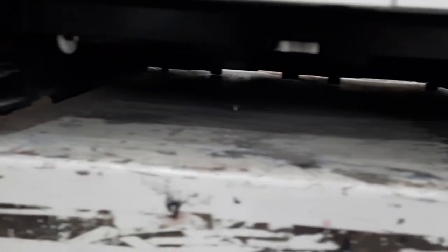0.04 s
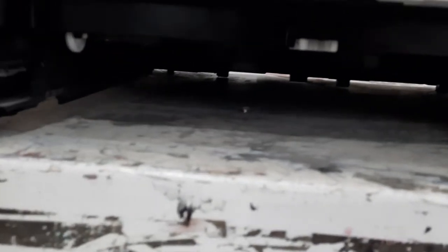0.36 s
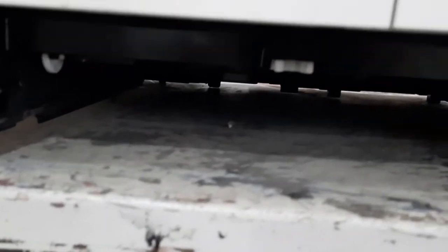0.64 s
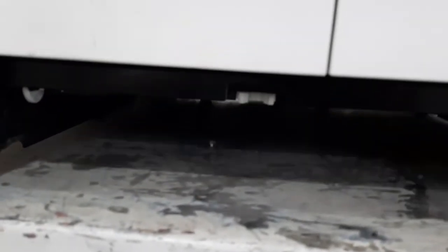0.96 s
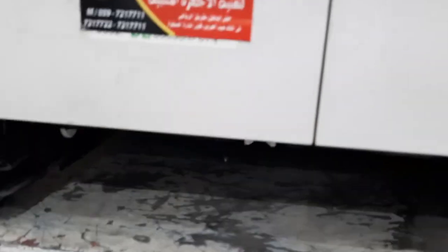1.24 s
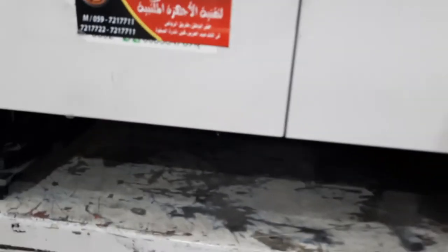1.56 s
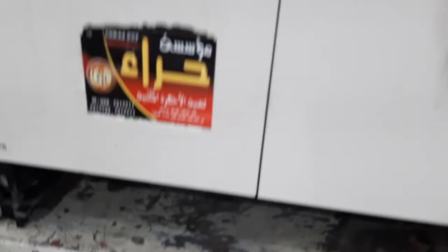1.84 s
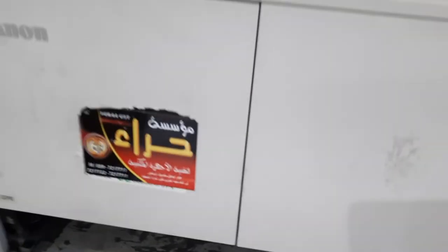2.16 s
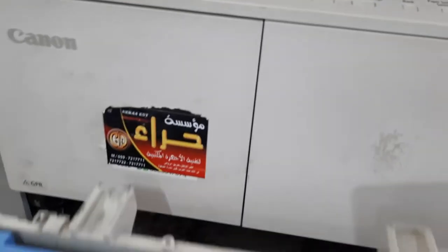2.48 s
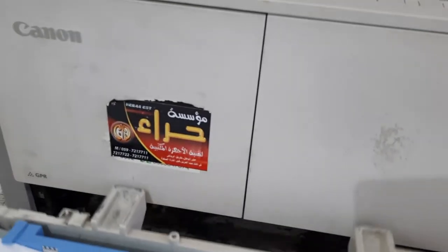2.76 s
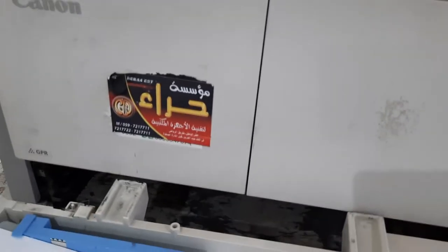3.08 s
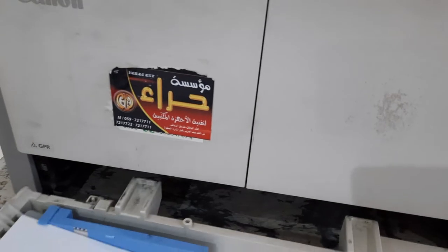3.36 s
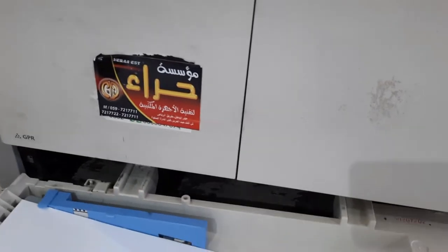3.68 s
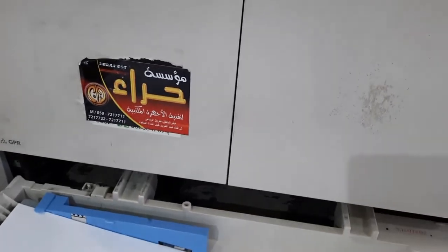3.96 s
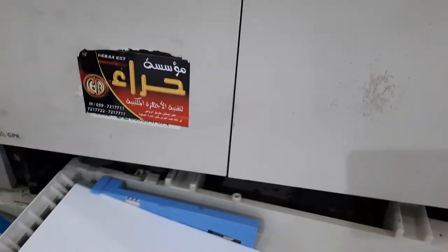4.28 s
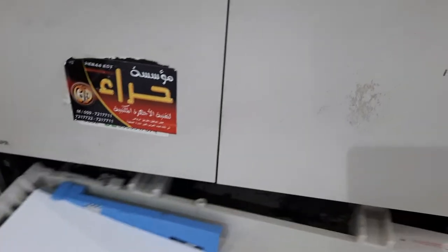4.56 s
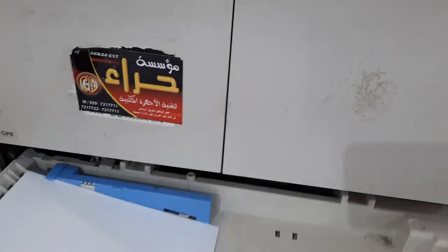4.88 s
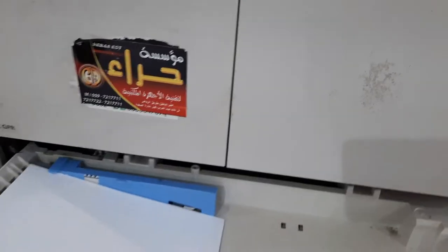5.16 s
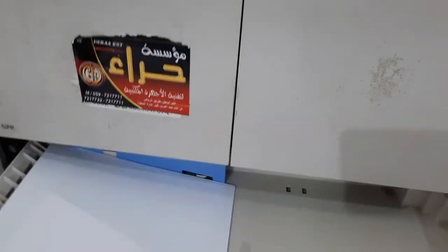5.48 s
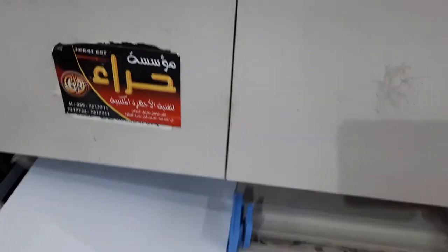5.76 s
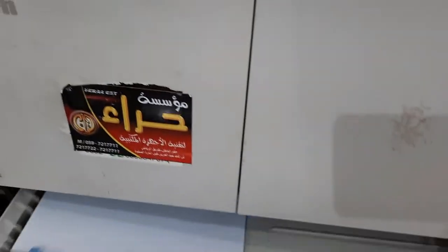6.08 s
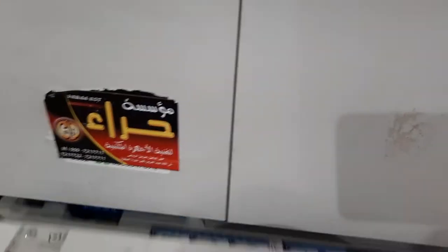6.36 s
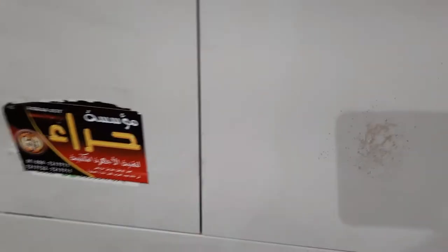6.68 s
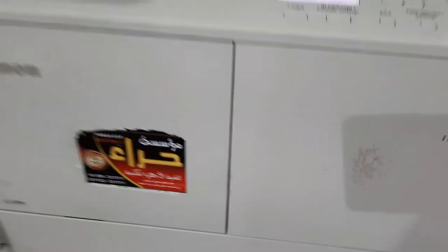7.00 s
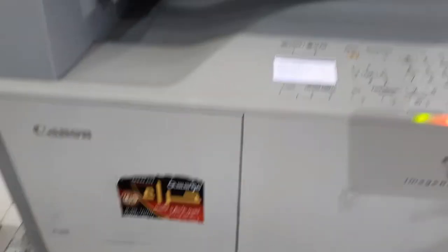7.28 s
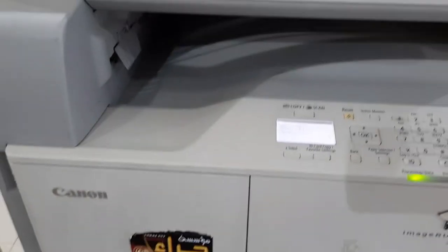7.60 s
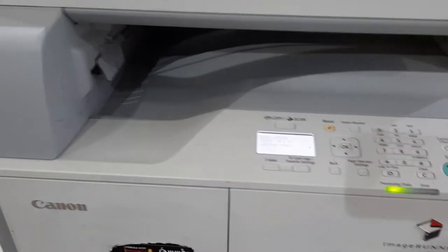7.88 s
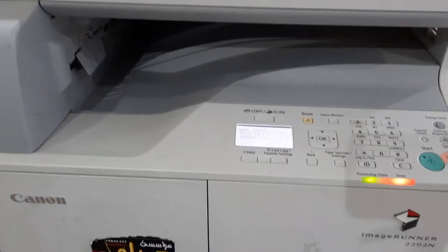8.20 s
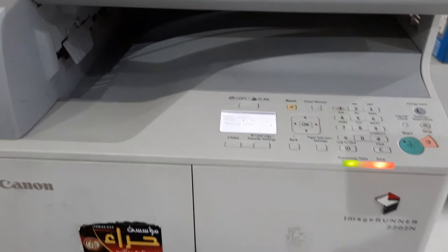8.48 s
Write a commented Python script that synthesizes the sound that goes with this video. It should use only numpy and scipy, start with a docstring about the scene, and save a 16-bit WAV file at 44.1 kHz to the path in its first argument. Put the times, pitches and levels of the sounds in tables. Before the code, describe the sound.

In a hard-walled room with a low hum and faint distant traffic, a loaded plastic paper tray is picked up with a few light knocks. It bumps and clatters against an office copier, tabs snapping as it is jiggled onto its rails, then scrapes inward and shuts with a hollow, ringing thud. A catch clicks close by. Soft handling rumble sits on the nearby stereo microphones.

```python
"""Loading an office copier's paper tray

In a hard-walled room a loaded plastic tray is lifted, knocked onto its rails, slid in and shut with a
thud. Loose parts clatter and tabs snap in the tray, and the cabinet rings along once the tray is in it.
Afterwards a catch clicks close by. Underneath lie a low hum, distant traffic and an uneven low rumble
of handling at the microphones."""
import sys
import numpy as np
from scipy import signal
from scipy.fft import rfft, irfft, next_fast_len
from scipy.io import wavfile
from scipy.ndimage import uniform_filter1d, map_coordinates

SR = 44100
rng = np.random.default_rng(int(sys.argv[2]) if len(sys.argv) > 2 else 0)


def write(x):
    x = np.atleast_2d(x).T
    wavfile.write(sys.argv[1], SR, np.round(np.clip(x, -1, 1) * 32767).astype(np.int16))


N = 381024

# Spectra of the far traffic and the faint hiss: frequency_hz, density_db
DRONE_SPECTRUM = [(120, -24), (200, -13), (260, 0), (340, -1), (440, -3), (520, -14), (800, -30),
                  (2000, -90)]
WASH_SPECTRUM = [(100, 1), (600, -1), (1000, 1.5), (1800, -4.5), (3000, -18), (6000, -27), (16000, -42)]
HISS_SPECTRUM = [(2000, -4), (5500, 0), (8000, -3), (10000, -9), (16000, -11)]
# Spectrum of the handling rumble and the cabinet's shudder: frequency_hz, density_db
RUMBLE_SPECTRUM = [(20, -32), (40, -14), (63, 0), (90, -7), (125, -7), (180, -16), (300, -22), (500, -45),
                   (1200, -90)]
# Course of the handling rumble at the microphones: time_s, level_db
HANDLING_LEVELS = [(0, -42), (.8, -51), (.97, -52.5), (1.12, -43.5), (1.42, -58), (1.549, -62), (1.95, -55),
                   (2.14, -63), (2.4, -55.5), (3.1, -52), (3.3, -64), (7.1, -57.5), (7.349, -64),
                   (8.6, -56.5)]
# Traffic passing in the distance: loudest_s, half_length_s, drone_db, wash_db
TRAFFIC_PASSES = [(0.07, 0.33, -44, -68.5), (8.597, 0.9, -62, -64)]
# Narrow tones in the drone: pitch_hz, width_hz, gain_db
DRONE_TONES = [(272, 150, 0), (427, 15, -0.5)]
# Spells of hum, cabinet shudder, paper swish and tray groan: start_s, length_s, level_db
HUM_SPELLS = [(0, 3.1, -49), (7.893, 0.64, -62)]
SHUDDER_SPELL = (3.5, 3.4, -46.5)
PAPER_SPELL = (4.505, .09, -35.5)
GROAN_SPELL = (3.585, 0.16, -32)

# Ring times of the room, the cabinet's hollow and its panels: frequency_hz, t60_s
ROOM_DECAY = [(100, 1.25), (400, 1.3), (1000, 1.08), (2500, .96), (5000, .76), (9000, .68), (15000, .62)]
HOLLOW_DECAY = [(100, 0.72), (1000, 0.49), (12000, 0.41)]
PANEL_DECAY = [(80, 1.9), (330, 1.56), (520, 0.16), (1200, 0.12)]
# Stereo width at the microphones: frequency_hz, side_gain_db
STEREO_WIDTH = [(60, -22), (170, -19), (330, -12), (650, -8), (1100, -.5), (4000, 0), (14000, 0)]
# Balance between the microphones: frequency_hz, left_minus_right_db
STEREO_BALANCE = [(80, 0), (330, 1.2), (700, 2.4), (1400, 1.9), (2800, .6), (5600, -2.6), (10000, 1.6),
                  (14000, 3.9)]

# Spectra of the sounds at the copier: frequency_hz, density_db
CLICK_SPECTRUM = [(300, -40), (1200, 4), (2000, 6), (5500, 4), (8500, 1.5), (11000, -5.5), (16000, -2)]
PAPER_SPECTRUM = [(800, -10.5), (2300, -6.5), (3300, 1.5), (7000, -4.5), (9000, -15.5), (15000, -23.5)]
RAIL_SPECTRUM = [(25, -52), (50, -7), (80, -0.5), (200, -2), (350, -8), (620, -6), (1500, -10), (3000, -16),
                 (6000, -23), (9800, -33.5), (12500, -29), (16000, -45)]
CRACK_SPECTRUM = [(300, -17), (900, -8), (2600, 0.5), (5500, -1), (7500, -8), (10000, -10), (14000, -13),
                  (16000, -18)]
BOOM_SPECTRUM = [(50, -10), (85, -6.5), (140, 0), (230, -11.5), (325, 0.5), (410, -14.5), (520, 4.5),
                 (800, -3.5), (1100, -5), (2000, -43.5)]
PLASTIC_SPECTRUM = [(25, -48), (50, -20), (80, -11), (160, -5), (300, -4), (600, -2), (1200, -8),
                    (2300, -14), (5500, -20), (9500, -31), (13000, -33), (16000, -42)]
# Modes of the front panel and of a stiff tab: pitch_hz, gain_db, t60_s
FRONT_PANEL_MODES = [(141, -9, 0.51), (295, -13, 0.15), (326.7, 16, 0.11), (630, -25, .08)]
TAB_MODES = [(2210, -3.5, .014), (2660, -9.5, 0.017), (3900, -5.5, 0.012), (4530, -7.5, 0.014),
             (4770, -4, 0.0098), (6126, -3.5, .012), (8850, -12, 0.0086)]
# Resonances of the tray, and of the cabinet with its rails: pitch_hz, width_hz, gain_db
TRAY_MODES = [(80, 9.5, 10.5), (150, 42, -0.5), (209, 6.9, 4), (320.6, 18, -1), (620, 33, -9),
              (668, 34, -7), (761, 49, -15.5), (968, 41, -6.5), (1134, 30, -1), (1205, 44, -9),
              (1426, 9.2, 7), (1965, 14, 6), (2283, 150, 2)]
CABINET_MODES = [(81.5, 12, 1), (140, 8.4, -9), (216, 13, -1), (314, 26, 5.5), (512, 9.1, 3), (490, 17, -9),
                 (620, 34, -2.5), (700, 35, -10), (830, 22, -4.5), (950, 20, -2.5), (1067, 12, -0.5),
                 (1426, 15, -3), (1630, 33, -5)]

# Clicks near the microphones: start_s, level_db, ring_offset_db, cutoff_hz
NEAR_CLICKS = [(1.514, -43.5, -35, 10600), (6.875, -40, 10, 5200)]
# Friction on the rails: time_s, relative_level_db
RAIL_FRICTION = [(5.27, -70), (5.35, -35), (5.516, -43), (5.61, -33), (5.754, -31.5), (5.886, -30),
                 (6.104, -38), (6.255, -35), (6.3, -32.5), (6.42, -34.5), (6.464, -36.5), (6.55, -29.5)]
# Shift of the resonances as the tray goes in: time_s, pitch_ratio
TRAVEL_PITCH = [(5.4, 1.12), (5.8, 1.02), (6.1, .95), (6.5, 1.0)]
# Plastic tabs and guides snapping: start_s, level_db, pitch_ratio
TAB_SNAPS = [(2.872, -25, 0.88), (4.386, -33.5, 0.59), (4.393, -31, 1.2), (4.824, -28.5, 0.86),
             (4.883, -37.5, 0.82), (4.972, -37.5, 0.93), (5.485, -40, 0.7), (5.729, -37.5, 1.6),
             (5.924, -34.5, 1), (5.969, -36.5, 0.85), (6.027, -41, 0.74), (6.081, -40.5, 1.2),
             (6.282, -32, 0.89), (6.308, -33.5, 0.64), (6.357, -36, 0.88)]
# The tray hitting its stop: start_s, level_db
TRAY_STOP = (6.503, -22)
# Thud, knock, clack and snap bands of a blow: low_hz, high_hz
BLOW_BANDS = [(55, 350), (350, 2000), (2000, 6500), (6500, 17000)]
# Blows as the tray is picked up (1.3 s), brought to the opening (2.8 s), bumped on the lip (3.5 s),
# jiggled onto the rails (4.6 s), pushed in (5.3 s) and slammed shut (6.4 s):
# start_s, level_db, hardness_db, rattle_t60_s, note_hz, note_offset_db
TRAY_BLOWS = [(1.306, -35, -4, 0.18, 1020, -18), (1.333, -37, -9.5, 0.1, 930, -14.5),
              (1.73, -30.5, 0.5, 0.21, 750, -13.5), (2.833, -31.5, 0, 0.062, 1260, -3.5),
              (2.873, -28, 1.5, 0.065, 330, 2), (2.976, -40, 1.5, 0.11, 200, 3),
              (3.466, -29.5, -1, 0.24, 1130, -11.5), (3.501, -19.5, -2, 0.2, 400, -3.5),
              (3.829, -21.5, -10, 0.035, 158.6, -10), (3.84, -27.5, 1.5, 0.054, 169, -6.5),
              (4.214, -26.5, -17, 0.035, 600, 0.5), (4.225, -27, 3, 0.12, 1150, -6.5),
              (4.311, -29, -7, 0.12, 355, 8), (4.334, -23, -4, 0.075, 368, 4),
              (4.366, -25.5, 2, 0.16, 370, -4.5), (4.474, -41.5, -5, 0.052, 145, 4.5),
              (4.623, -26, -4.5, 0.21, 195, -2), (4.663, -22, -2, 0.19, 440, -5),
              (4.695, -16.5, 2.5, 0.04, 650, -12.5), (4.779, -20.5, -1.5, 0.19, 135, -8.5),
              (4.928, -22.5, 0, 0.11, 585, -4), (5.04, -44.5, 2.5, 0.038, 650, -1.5),
              (5.11, -44, -2, 0.15, 220, -2), (5.344, -36, -14, 0.12, 650, -1),
              (5.379, -25.5, 1, 0.22, 342, 0.5), (5.412, -21, -1.5, 0.19, 670, -9.5),
              (5.44, -25.5, 1, .06, 200, -5.5), (5.66, -34.5, 7, 0.14, 1070, -4.5),
              (5.775, -29.5, 5.5, 0.21, 545, 0.5), (5.849, -30, 8.5, .03, 1700, -7.5),
              (5.857, -23.5, 19, 0.032, 1500, 2.5), (5.875, -29, -6.5, 0.032, 930, 3.5),
              (5.989, -26.5, -2.5, 0.12, 208, -3), (6.065, -32.5, -9, 0.1, 1070, -0.5),
              (6.19, -31.5, -2.5, 0.09, 605, -4), (6.266, -28, 2.5, 0.053, 650, -4),
              (6.283, -29, 7, 0.075, 805, -6.5), (6.353, -32, -1.5, 0.24, 750, 0),
              (6.436, -27, -14, 0.11, 776, 3), (6.456, -20.5, -1, 0.18, 216, -3.5),
              (6.481, -21.5, 7, 0.1, 650, -6.5), (6.503, -16, -3, 0.058, 564, -2.5),
              (6.521, -17.5, 0.5, 0.16, 490, -1.5)]


def amp(db):
    """Decibels to amplitude."""
    return 10 ** (np.asarray(db) / 20)


def unit(x):
    """x scaled to an RMS of 1."""
    return x / np.sqrt(np.mean(x ** 2) + 1e-20)


def along(points, hz):
    """Read (frequency_hz, value) points on a log axis."""
    knots_hz, values = np.transpose(points)
    return np.interp(np.log(hz + 1), np.log(knots_hz + 1), values)


def wobble(rate):
    """A smooth random curve, rate knots a second."""
    return map_coordinates(rng.standard_normal(int(N * rate / SR) + 4), [np.arange(N) * rate / SR])


def envelope(start_s, length_s, db, attack_s, sag_db_per_s, release_s):
    """Gain per sample: a rise, a sagging hold, then a release that falls 60 dB in release_s."""
    t = np.maximum(np.arange(N) / SR - start_s, 0)
    sag_db = sag_db_per_s * np.minimum(t, length_s)
    release_db = 60 * np.maximum(t - length_s, 0) / release_s
    return np.minimum(t / attack_s, 1) * amp(db - sag_db - release_db)


def burst(x, db):
    """Scale a short sound to the energy of 20 ms at this level."""
    return amp(db) * x * np.sqrt(SR / 50) / (np.linalg.norm(x[0]) + 1e-12)


def add(track, start_s, x):
    """Mix x into the track."""
    part = track[:, round(start_s * SR):][:, :x.shape[-1]]
    part += x[:, :part.shape[-1]]


def filtered(x, response):
    """x through a response given as a function of frequency."""
    length = x.shape[-1]
    size = next_fast_len(length + SR // 4)
    return irfft(rfft(x, size) * response(np.fft.rfftfreq(size, 1 / SR)), size)[..., :length]


def ring(x, impulse):
    """x convolved with an impulse response."""
    return signal.fftconvolve(np.atleast_2d(x), np.atleast_2d(impulse), axes=1)[:, :x.shape[-1]]


def coloured(x, spectrum):
    """x through a minimum-phase filter with this spectrum."""
    size = 4096
    gain_db = np.maximum(along(spectrum, np.fft.rfftfreq(size, 1 / SR)), -90)
    cepstrum = irfft(np.log(amp(gain_db)))
    cepstrum[1:size // 2] *= 2
    cepstrum[size // 2 + 1:] = 0
    return ring(x, irfft(np.exp(rfft(cepstrum))))


def noise(spectrum):
    """Steady mid and side noise with this spectrum."""
    return unit(coloured(rng.standard_normal((2, N)), spectrum))


def resonances(modes, hz):
    """Summed response of (pitch_hz, width_hz, gain_db) modes."""
    return sum(amp(db) * 1j * hz * width / (pitch ** 2 - hz ** 2 + 1j * hz * width)
               for pitch, width, db in modes)


def body(x, modes, pitch=1, scatter_db=0):
    """x through a body's resonances, shifted in pitch and scattered in strength."""
    varied = np.array(modes) * [pitch, 1, 1]
    varied[:, 2] += scatter_db * rng.standard_normal(len(modes))
    return filtered(x, lambda hz: 1 + resonances(varied, hz))


def tail(decay, size):
    """A dense mid and side impulse response; each frequency dies at its own speed."""
    hz, t, bins = signal.stft(rng.standard_normal((2, size)), SR, nperseg=256)
    t60 = along(decay, hz)[:, None]
    pair = signal.istft(bins * amp(-60 * t / t60) / np.sqrt(t60), SR, nperseg=256)[1]
    return pair / np.linalg.norm(pair[0])


def diffuse(x, decay):
    """A dense echo field: each frequency stores energy and lets it out as fading noise."""
    hz, t, bins = signal.stft(x, SR, nperseg=256)
    fade = amp(-120 * t[t < 1.5] / along(decay, hz)[:, None])
    energy = np.abs(ring(np.abs(bins) ** 2, fade / fade.sum(1, keepdims=True)))
    grain = signal.stft(rng.standard_normal((2, N)), nperseg=256)[2]
    return signal.istft(grain * np.sqrt(energy) / np.std(grain), nperseg=256)[1][:, :N]


def chatter(size, per_s, spread_db):
    """Tiny contacts at random moments, of widely differing strength."""
    touches = rng.random(size) < per_s / SR
    sign = rng.choice([-1, 1], size)
    return touches * sign * amp(spread_db * np.clip(rng.standard_normal(size), -2, 2))


def thin_walls(force, direct, t60, lag_samples):
    """Plastic walls in mid and side: each contact reaches one microphone first, then rings as noise."""
    t = np.arange(SR // 8) / SR
    decay = amp(-120 * t / t60)
    energy = np.abs(ring(force ** 2, decay / decay.sum()))
    left, right = (np.pad(force, (max(lag, 0), 0))[:len(force)] for lag in (lag_samples, -lag_samples))
    ringing = np.sqrt(energy / 2) * rng.standard_normal((2, len(force)))
    return direct * np.array([left + right, left - right]) / 2 + ringing


def hiss():
    """A faint, steady hiss behind everything."""
    return amp(-77.5) * noise(HISS_SPECTRUM)


def traffic():
    """Far off, a drone and a wash swell as traffic passes."""
    t = np.arange(N) / SR
    drone_gain, wash_gain = amp(-68), amp(-66)  # between passes
    for loudest_s, half_length_s, drone_db, wash_db in TRAFFIC_PASSES:
        swell = np.exp(-((t - loudest_s) / half_length_s) ** 2)
        drone_gain = drone_gain + amp(drone_db) * swell
        wash_gain = wash_gain + amp(wash_db) * swell
    drone = unit(filtered(noise(DRONE_SPECTRUM), lambda hz: 1 + amp(14.5) * resonances(DRONE_TONES, hz)))
    return drone_gain * drone + wash_gain * noise(WASH_SPECTRUM)


def handling_rumble():
    """An uneven low rumble of handling at the microphones."""
    level_db = np.interp(np.arange(N) / SR, *np.transpose(HANDLING_LEVELS))
    return amp(level_db + 0.87 * wobble(4.2)) * noise(RUMBLE_SPECTRUM)


def hum(pitch_hz=119.0, waver_hz=1.6, flutter_db=2):
    """A low hum comes and goes in the room, wavering in pitch and level."""
    phase = 2 * np.pi * np.cumsum(pitch_hz + waver_hz * wobble(6.3)) / SR
    gain = sum(envelope(*spell, attack_s=0.059, sag_db_per_s=2, release_s=1.2) for spell in HUM_SPELLS)
    return gain * unit(np.sin(phase) * amp(flutter_db * wobble(18)))


def echoes(mid, hollow_db, room_db):
    """The cabinet's hollow rings briefly; the room rings long, with modes below and a dense field above."""
    bass, treble = (signal.sosfilt(signal.butter(5, 1500, kind, fs=SR, output="sos"), mid)
                    for kind in ("low", "high"))
    out, size = np.zeros((2, N)), SR // 3
    add(out, 0.006, amp(room_db) * diffuse(treble, ROOM_DECAY))
    for start in range(0, N, size):  # the moving tray excites the modes differently from place to place
        part = slice(start, start + size)
        hollow = signal.fftconvolve(mid[None, part], tail(HOLLOW_DECAY, SR // 3), axes=1)
        room_modes = signal.fftconvolve(bass[None, part], tail(ROOM_DECAY, 5 * SR // 4), axes=1)
        add(out, start / SR + 0.002, amp(hollow_db) * hollow)
        add(out, start / SR + 0.00598, amp(room_db - 6.5) * room_modes)
    return out


def cabinet_shudder():
    """The cabinet rumbles softly on its stand while the tray is worked into it."""
    gain = envelope(*SHUDDER_SPELL, attack_s=0.045, sag_db_per_s=0, release_s=0.45)
    return gain * noise(RUMBLE_SPECTRUM)


def spring(start_s=1.514, pitch_hz=2885, level_db=-67, t60=1.1):
    """A small spring rings on faintly after the first click."""
    out, t = np.zeros((2, N)), np.arange(SR // 2) / SR
    tone = np.sin(2 * np.pi * (pitch_hz * t + rng.random((2, 1))))
    add(out, start_s, amp(level_db - 60 * t / t60) * tone)
    return out


def clicks(tick_t60=0.013):
    """Two small clicks close by; the duller one, from the catch, sets the front panel ringing."""
    out, t = np.zeros((2, N)), np.arange(SR // 3) / SR
    panel = np.zeros((2, len(t)))
    for hz, db, t60 in FRONT_PANEL_MODES:
        panel += amp(db - 60 * t / t60) * np.sin(2 * np.pi * hz * t)
    for start_s, db, ring_db, cutoff_hz in NEAR_CLICKS:
        tick = coloured(rng.standard_normal((2, len(t))) * amp(-60 * t / tick_t60), CLICK_SPECTRUM)
        tick = signal.sosfilt(signal.butter(2, cutoff_hz, fs=SR, output="sos"), tick)
        add(out, start_s, burst(tick, db - 0.5) + burst(panel, db + ring_db))
    return out


def paper_swish():
    """The paper stack shifts in the tilted tray with a short hiss."""
    gain = envelope(*PAPER_SPELL, attack_s=0.0062, sag_db_per_s=66.5, release_s=0.22)
    return gain * noise(PAPER_SPECTRUM)


def tray_groan(judder_hz=335):
    """Dragged over the cabinet's lip, the tray judders briefly at one of its wall resonances."""
    phase = 2 * np.pi * np.cumsum(judder_hz * (1 + 0.0333 * wobble(46))) / SR
    judder = (np.sin(phase) + 0.055 * np.sin(2 * phase)) * amp(2.9 * wobble(41))
    gain = envelope(*GROAN_SPELL, attack_s=0.02, sag_db_per_s=39.5, release_s=0.25)
    return gain * unit(judder) * np.array([[1], [0]])  # mid only


def rail_scrape(snags_per_s=24, snag_db=3, snag_t60=0.042):
    """The tray scrapes along its rails in small uneven slips, with a spurt after each snag."""
    out, t = np.zeros((2, N)), np.arange(N) / SR
    snags = 1.0 * (rng.random(N) < snags_per_s / SR)
    spurts = ring(snags, amp(snag_db - 60 * t[:SR // 4] / snag_t60))[0]
    slips = chatter(N, per_s=2400, spread_db=7) * amp(1.88 * wobble(35)) * (1 + spurts)
    scrape = thin_walls(slips, direct=0.63, t60=0.051, lag_samples=1)
    singing = ring(scrape, tail(HOLLOW_DECAY, SR // 4))  # the rails' many fine resonances
    scrape = coloured(scrape + 0.6 * singing, RAIL_SPECTRUM)
    friction_s, friction_db = np.transpose(RAIL_FRICTION)
    moving = (t >= friction_s[0]) & (t <= friction_s[-1])
    travel_s, pitches = np.transpose(TRAVEL_PITCH)
    for pitch, share in zip(pitches, np.eye(len(travel_s))):
        crossfade = np.sqrt(np.interp(t[moving], travel_s, share))
        out[:, moving] += crossfade * unit(body(scrape[:, moving], CABINET_MODES, pitch))
    return amp(np.interp(t, friction_s, friction_db) - 3) * out


def tab_snaps(crack_t60=0.054, ring_db=-7):
    """A tab springs past its edge: one sharp crack and a short ring of the small stiff part."""
    out, t = np.zeros((2, N)), np.arange(SR // 10) / SR
    for start_s, db, pitch in TAB_SNAPS:
        crack = coloured(rng.standard_normal((2, len(t))) * amp(-60 * t / crack_t60), CRACK_SPECTRUM)
        tab = np.zeros_like(crack)
        for hz, mode_db, t60 in TAB_MODES:
            fade = amp(mode_db + rng.normal(0, 2) - 60 * t / t60)
            tab += fade * np.sin(2 * np.pi * (pitch * hz * t + rng.random((2, 1))))
        add(out, start_s, burst(crack, db) + burst(tab, db + ring_db))
    return out


def cabinet_boom(mode_count=160, attack_s=0.0044):
    """The tray hits its stop: a short hollow note, then a rumble as the large panels ring longest."""
    out, t = np.zeros((2, N)), np.arange(3 * SR // 2) / SR
    start_s, db = TRAY_STOP
    hz = np.geomspace(55, 1400, mode_count) * (1 + 0.01 * rng.standard_normal(mode_count))
    t60 = along(PANEL_DECAY, hz)
    strength = amp(along(BOOM_SPECTRUM, hz)) * np.sqrt(hz / t60)
    modes = strength[:, None] * np.exp(np.outer(2j * np.pi * hz - np.log(1000) / t60, t))
    phases = np.exp(2j * np.pi * rng.random((2, mode_count)))
    panels = (phases @ modes).real * np.minimum(t / attack_s, 1)
    add(out, start_s, amp(db) * panels / np.std(panels[0, :SR // 10]))
    return out


def tray_knocks(seated_from_s=5.33, note_width_ratio=0.096):
    """Each blow sounds the struck spot's note and rattles loose parts; hard ones snap, soft ones thud."""
    out, t = np.zeros((2, N)), np.arange(SR // 3) / SR
    bands = [signal.butter(3, edges, "bandpass", fs=SR, output="sos") for edges in BLOW_BANDS]
    for start_s, db, hardness_db, t60, note_hz, note_db in TRAY_BLOWS:
        seated = start_s > seated_from_s  # on its rails, the tray rings the cabinet instead
        rise_s = 0.18 * t60 ** 2  # short rattles start abruptly
        shake = np.minimum(t / rise_s, 1) * amp(-60 * np.maximum(t - rise_s, 0) / t60)
        force = shake * chatter(len(t), per_s=3000, spread_db=5)
        force[0] += 0.4 * np.linalg.norm(force) * np.exp(-rise_s / 0.0082)  # firm first contact
        walls = thin_walls(force, direct=0.67, t60=0.094, lag_samples=rng.integers(-10, 10))
        walls = coloured(walls, PLASTIC_SPECTRUM)
        # Every blow lands elsewhere and favours other resonances.
        blow = body(walls, CABINET_MODES if seated else TRAY_MODES, scatter_db=4)
        note = filtered(walls, lambda hz: resonances([(note_hz, note_width_ratio * note_hz, 0)], hz))
        add(out, start_s, burst(note, db + note_db))
        thud_db = (-5 if seated else -2.5) - 0.37 * hardness_db  # the rails damp the thud
        clack_db, snap_db = -4 + 0.56 * hardness_db, -16 + hardness_db
        for band, band_db in zip(bands, [thud_db, 0, clack_db, snap_db]):
            add(out, start_s, burst(signal.sosfilt(band, blow), db + band_db))
    return out


def scene():
    """At the microphone pair, bass reaches both sides alike; treble arrives from all around."""
    tray = tray_knocks() + rail_scrape() + tray_groan() + paper_swish()
    tabs = tab_snaps()
    near = clicks() + spring()
    into_room = tray + 0.28 * tabs + 0.71 * near
    room = echoes(into_room[0], hollow_db=-6, room_db=-9.5)
    cabinet = cabinet_boom() + cabinet_shudder()
    background = handling_rumble() + traffic() + hum() + hiss()
    mid, side = background + room + cabinet + near + tabs + tray
    side = filtered(side, lambda hz: amp(along(STEREO_WIDTH, hz)))
    left_right = np.array([mid + side, mid - side])
    return filtered(left_right, lambda hz: amp(np.outer([0.5, -0.5], along(STEREO_BALANCE, hz))))


def noise_suppressor(x, threshold_db=-93, deepest_cut_db=-3.5, full_from_hz=3000):
    """The recorder turns down treble that has faded close to silence, shortening the echo tails."""
    hz, _, bins = signal.stft(x, SR, nperseg=512)
    power = np.mean(np.abs(bins) ** 2, axis=0)
    power = uniform_filter1d(power, size=15, axis=0)  # across frequency
    power = np.abs(uniform_filter1d(power, size=5, axis=1))  # across time
    gain = np.maximum(power / (power + amp(threshold_db) ** 2), amp(deepest_cut_db))
    reach = np.clip(2 * hz / full_from_hz - 1, 0, 1)[:, None]
    return signal.istft(bins * gain ** reach, SR, nperseg=512)[1][:, :N]


def record(dry):
    """The recorder suppresses faint treble, rounds off the highest peaks and limits the band."""
    ceiling, top_hz = 0.9, 15900
    quieted = noise_suppressor(dry)
    rounded = quieted / (1 + np.abs(quieted / ceiling) ** 4) ** (1 / 4)
    return filtered(rounded, lambda hz: 1 / (1 + (hz / top_hz) ** 200))


dry = scene()
out = record(dry)
write(out)
```